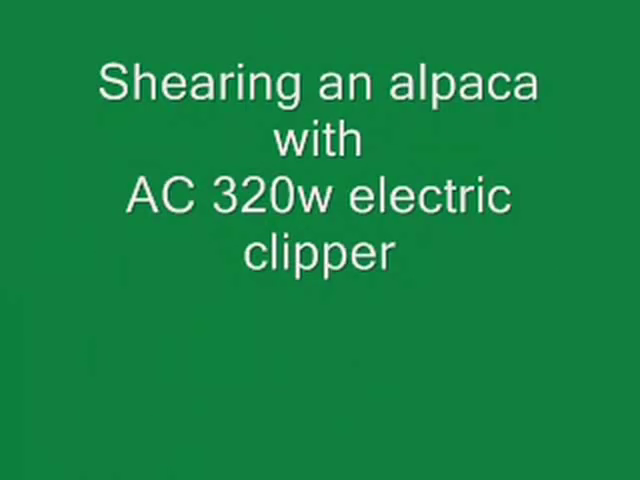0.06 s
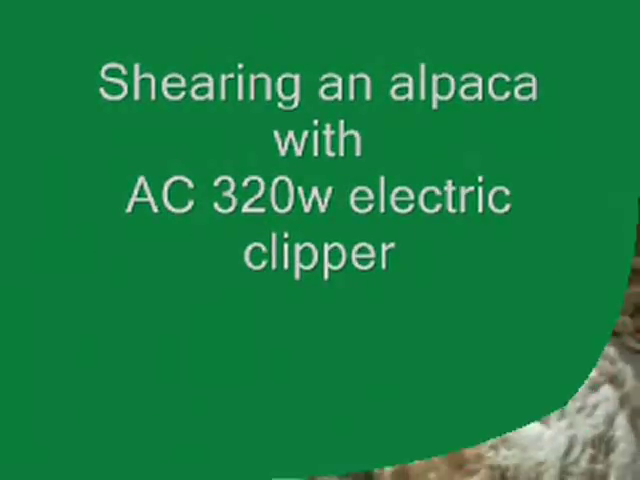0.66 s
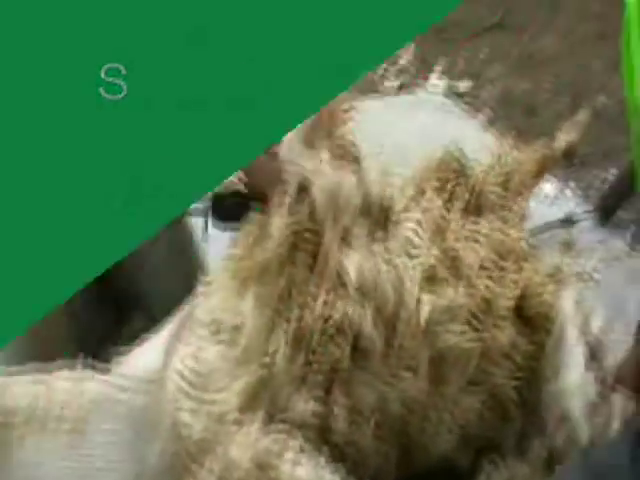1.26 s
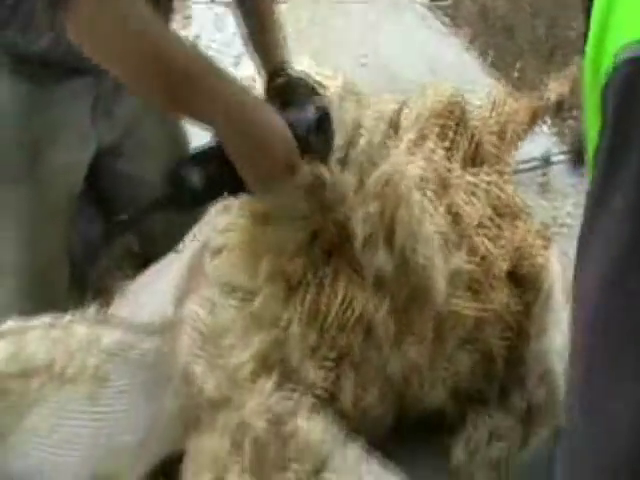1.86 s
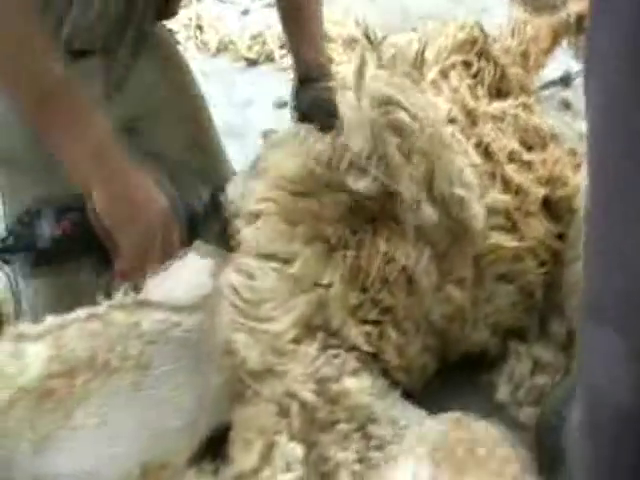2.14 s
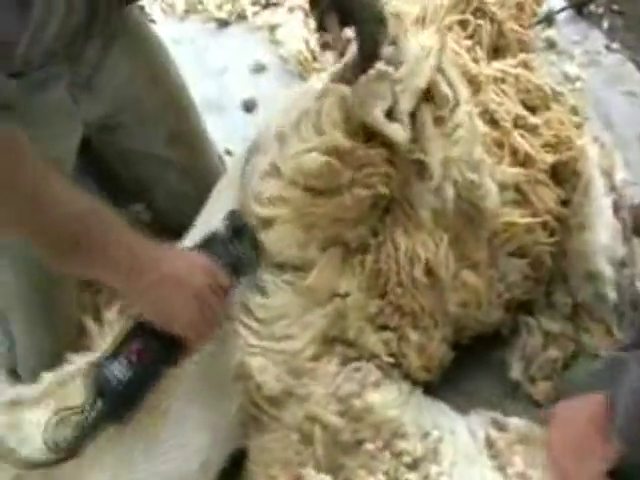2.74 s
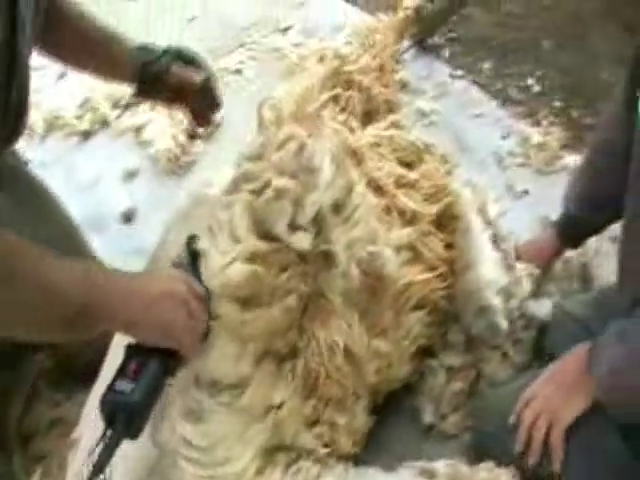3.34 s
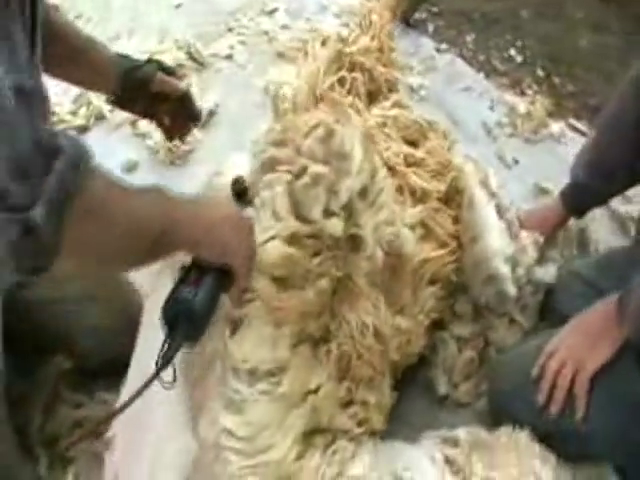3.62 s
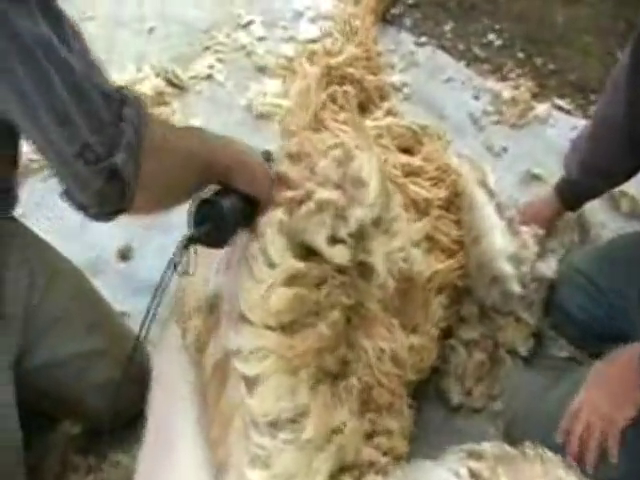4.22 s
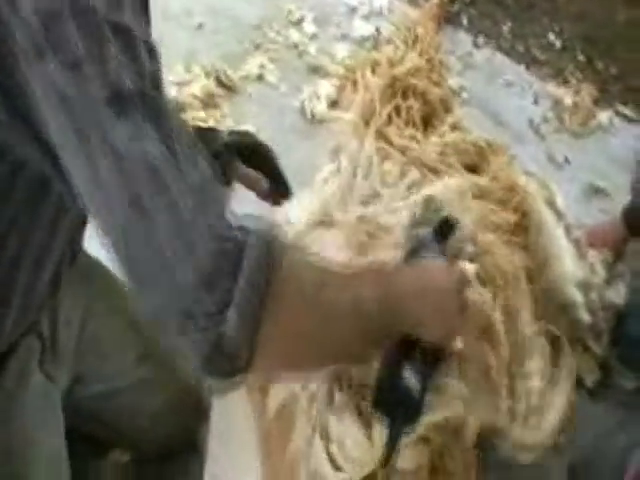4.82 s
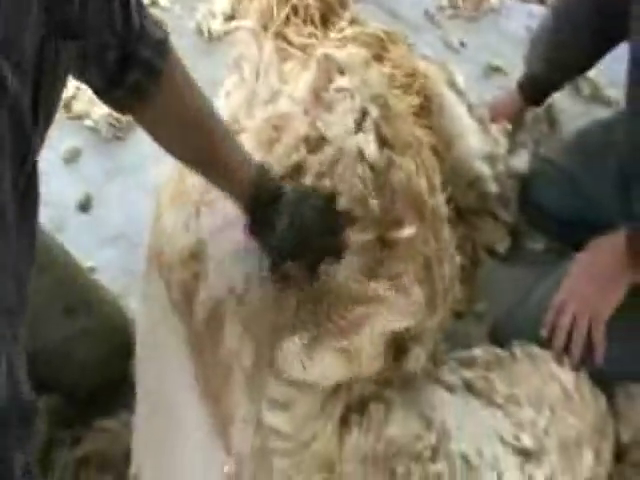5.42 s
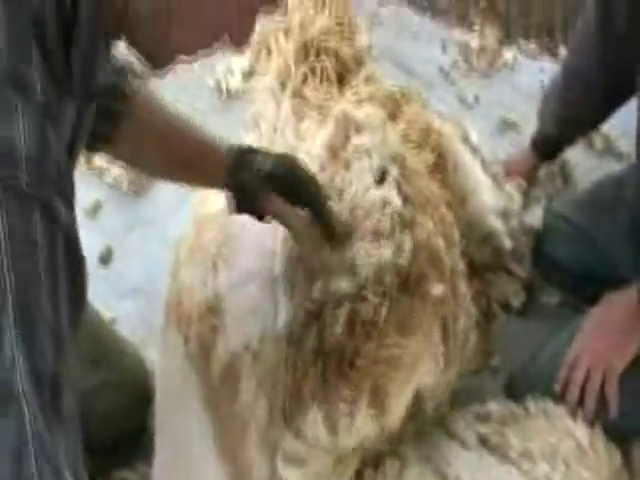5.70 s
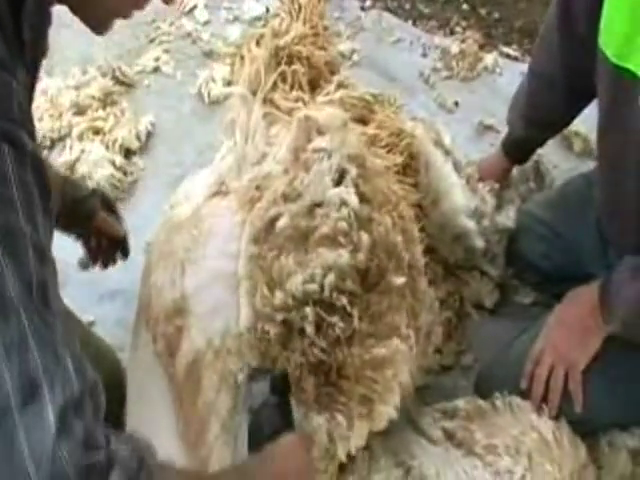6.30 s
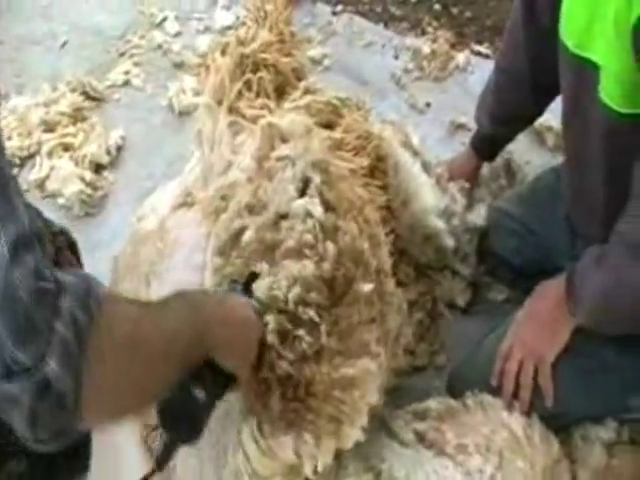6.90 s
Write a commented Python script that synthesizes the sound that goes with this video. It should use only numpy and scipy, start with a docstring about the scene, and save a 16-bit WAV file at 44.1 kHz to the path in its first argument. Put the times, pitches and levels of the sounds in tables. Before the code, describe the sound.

After a brief silence, an electric clipper cuts in, already running close to the microphone outdoors. Its high whine and fast metallic clatter mix with the hiss of alpaca fleece being cut. The pitch sags around the middle as the wool thickens, recovers, then dips again near the end. A small petrol engine hums steadily further off, and everything has a slightly hollow tinge.

```python
"""Outdoors at an alpaca shearing, a small camera's two microphone ports close to the electric handpiece.
The motor pinion whines, the cutter clatters to and fro over the steel comb, the fibres hiss as they are
cut, and the speed sags in thick fleece. A single-cylinder petrol engine hums further off.
The sound cuts in after a short silence. The camera's hum notches give it a hollow tinge."""
import sys
import numpy as np
from scipy import signal
from scipy.fft import rfft, irfft
from scipy.io import wavfile
from scipy.ndimage import map_coordinates

SR = 44100
rng = np.random.default_rng(int(sys.argv[2]) if len(sys.argv) > 2 else 0)


def generate_wav(sig):
    """Save sig (samples, or channels by samples) to the path in sys.argv[1] as 16-bit PCM at SR."""
    pcm = np.round(np.clip(np.atleast_2d(sig).T, -1, 1) * 32767).astype(np.int16)
    wavfile.write(sys.argv[1], SR, pcm)


N = 306936
T = np.arange(N) / SR
HZ = np.fft.rfftfreq(N, 1 / SR)

# motor shaft, slowing as the fleece thickens: t/s, speed/(turns/s)
SHAFT_SPEED = [(0.4, 365.0), (0.92, 374.4), (1.42, 375.8), (1.66, 381.8), (1.86, 383.3), (2.24, 380.0),
               (2.74, 382.6), (3.12, 373.4), (3.32, 366.2), (4.36, 349.2), (4.48, 349.6), (5.06, 367.1),
               (5.52, 376.0), (5.68, 376.6), (5.88, 373.3), (6.22, 363.9), (6.54, 362.2), (6.93, 353.4)]
# pinion whine: t/s, level/dB (all levels are relative; each layer adds its own trim)
WHINE_LEVEL = [(0.42, -34), (0.52, -38), (0.88, -32), (1.05, -32.5), (1.2, -24.5), (1.33, -25.5),
               (1.52, -34.5), (1.64, -28.5), (1.84, -44), (2.05, -22.5), (2.15, -29), (2.25, -20),
               (2.4, -28), (2.6, -27), (2.86, -30.5), (3.06, -30.5), (3.28, -26.5), (3.46, -40),
               (3.58, -25.5), (3.72, -37.5), (3.88, -28.5), (4.2, -29), (4.32, -45), (4.58, -36),
               (4.78, -29.5), (4.86, -35), (5.12, -33), (5.28, -25), (5.47, -30.5), (5.6, -22.5),
               (5.74, -22), (5.86, -34), (6.15, -25.5), (6.4, -26), (6.55, -32), (6.7, -36), (6.84, -27.5),
               (6.95, -33)]
# sidebands one stroke rate below, one and two above the whine: t/s, level/dB of each
SIDEBAND_LEVELS = [(0.4, -36, -36, -46), (1.0, -42, -46, -38), (1.35, -32, -40, -40), (1.8, -35, -46, -48),
                   (2.05, -37, -50, -44), (2.27, -26, -29, -29), (2.7, -33.5, -65, -39),
                   (3.1, -41, -53, -49), (3.4, -36, -31, -46), (3.65, -39, -31, -28), (3.95, -33, -39, -32),
                   (4.3, -31, -36, -32), (4.8, -33, -40, -36), (5.3, -38, -33, -33), (5.6, -27, -39, -37),
                   (5.8, -37, -35, -41), (6.1, -28, -28.5, -28), (6.35, -27, -29, -47),
                   (6.6, -62, -53, -51), (6.9, -33.5, -59, -42)]
# octave of the whine: t/s, level/dB
OCTAVE_LEVEL = [(0.4, -38), (0.52, -38), (0.8, -36.5), (1.0, -35), (1.15, -40), (1.52, -40), (1.74, -42),
                (1.86, -44), (1.99, -30.5), (2.5, -34), (2.78, -32.5), (3.05, -41), (3.18, -36),
                (3.36, -37), (3.52, -40), (3.68, -32), (3.95, -34), (4.08, -36), (4.22, -33), (4.45, -38),
                (4.9, -40), (5.15, -50), (5.8, -33.5), (5.92, -38), (6.1, -32.5), (6.48, -42), (6.63, -33),
                (6.8, -38)]
# gears chattering in their play: start/s, length/s, rise/dB
CHATTER_BOUTS = [(1.2, 0.26, 4.5), (2.03, 0.074, 12.5), (2.145, 0.14, 9.5), (2.32, 0.21, 6),
                 (3.46, 0.09, 3), (3.615, 0.066, 6.5), (3.8, 0.43, 2), (4.32, 0.14, 4.5), (5.23, 0.13, 6.5),
                 (5.55, 0.15, 2), (5.93, 0.38, 1), (6.82, .13, -6)]
# weak motor tones: multiple of the shaft speed, level/dB
SHAFT_HARMONICS = [(5, -46), (6, -43), (8, -42), (9, -49), (11, -46), (12, -45), (13, -48), (16, -51),
                   (19, -52), (21, -42), (24, -50), (25, -49), (26, -55), (28, -53)]
# the one spell in which the casing rings: start/s, length/s
CASING_RING_SPELL = (3.68, 1.9)
# colour of the clatter: f/Hz, level/dB
CLATTER_SPECTRUM = [(180, -52), (300, -22), (351, 16), (458, 3), (701, -11.5), (901, -18.5), (1120, -16),
                    (2310, -2), (2580, -4.5), (3210, -5.5), (4200, -11.5), (5150, -14.5), (7870, -14),
                    (10400, -23), (12800, -37.5), (16600, -68), (22000, -120)]
# housing resonances on top of that colour: f/Hz, width/Hz, level/dB
HOUSING_MODES = [(1160, 450, -4), (2410, 110, 3), (2880, 630, -14), (3674, 490, 3.5), (6780, 190, -13)]
# cutter knocking in the housing: t/s, level/dB
KNOCK_LEVEL = [(0.42, -36), (0.58, -34.5), (2.01, -31.5), (2.58, -35.5), (2.59, -33), (3.05, -35.5),
               (3.45, -33.5), (3.95, -37.5), (5.3, -31.5), (5.35, -37.5), (5.57, -32), (6.02, -34),
               (6.57, -38), (6.93, -36)]
# steel comb rattling: t/s, level/dB
COMB_LEVEL = [(0.42, -29.5), (0.95, -30.5), (1.25, -27.5), (1.4, -33), (1.55, -26), (1.72, -29.5),
              (2.05, -26), (2.62, -26.5), (3.15, -32), (3.3, -29), (3.8, -33.5), (4.1, -32.5), (4.46, -30),
              (4.63, -34), (5.0, -34.5), (5.24, -28), (5.38, -31.5), (5.8, -31.5), (5.9, -28.5), (6.3, -26),
              (6.7, -34), (6.93, -33.5)]
# teeth biting into the fleece: t/s, level/dB
BITE_LEVEL = [(0.4, -27.5), (0.6, -23.5), (1.54, -30), (1.78, -25), (2.02, -24.5), (2.31, -33.5),
              (2.75, -32), (3.09, -26), (3.91, -28), (4.11, -23), (4.58, -26), (4.72, -26.5), (4.95, -23),
              (5.2, -25), (5.9, -28), (6.45, -29), (6.93, -27.5)]
# fibre hiss, following how fast they are cut: t/s, level/dB
FEED_LEVEL = [(0.4, -25), (1.4, -25.5), (1.56, -21.5), (1.96, -19.5), (2.06, -22), (2.94, -23.5),
              (3.64, -22.0), (4.66, -24), (4.8, -21), (4.96, -19), (5.14, -20), (5.42, -23.5), (5.72, -20),
              (5.8, -23), (6.64, -22.5), (6.72, -24), (6.93, -24.5)]
# gliding bands that ring in the clatter: start/s, length/s, first f/Hz, last f/Hz, width/Hz, level/dB
GLIDING_RINGS = [(.55, 0.38, 3670, 3680, 300, -31.5), (0.694, 0.32, 1860, 1830, 256, -29.5),
                 (1.16, 0.18, 3870, 4020, 256, -33.5), (1.527, 0.058, 1750, 1740, 330, -28),
                 (1.728, 0.15, 1700, 1860, 350, -33.5), (2.234, 0.74, 3440, 3370, 256, -35),
                 (2.655, 0.35, 2270, 2330, 256, -36), (3.31, 0.12, 3600, 3640, 256, -30.5),
                 (4.074, 0.2, 4020, 3850, 350, -29.5), (4.673, 0.045, 2180, 2140, 256, -31),
                 (4.744, 0.04, 2580, 2540, 256, -32), (4.848, 0.27, 3900, 4020, 1500, -25.5),
                 (5.23, 0.05, 2480, 2200, 256, -27), (6.516, 0.24, 2020, 1830, 330, -35),
                 (6.77, 0.16, 4700, 4600, 800, -31)]
# ring of the chattering teeth: f/Hz, width/Hz, level/dB
CHATTER_MODE = [(2540, 300, 0)]
# fibres sizzling brightly on the comb: start/s, length/s, rise/dB
SIZZLE_BOUTS = [(2.17, 0.42, 4.5), (2.56, 0.13, 5.5), (3.54, 0.15, 4.5), (4.46, 0.19, 4.5)]
# band of that sizzle: f/Hz, width/Hz, level/dB
SIZZLE_MODE = [(9500, 1200, 0)]
# distant engine at the microphone: t/s, level/dB
ENGINE_LOUDNESS = [(0.4, -37), (0.99, -37), (1.05, -34), (1.64, -31), (1.98, -34.5), (2.08, -39),
                   (4.05, -38), (4.55, -34.5), (4.75, -31.5), (4.92, -34.5), (4.99, -36), (5.6, -39.5),
                   (6.93, -37.5)]
# wavering engine tones: multiple of the firing rate, level/dB
ENGINE_HARMONICS = [(2, -24), (3, -12.5), (5, -7.5), (8, -8), (9, -8), (10, 1), (11, -4), (13, -8),
                    (14, -4.5), (15, -9), (16, -13.5), (17, -5.5), (20, -11)]
# colour of the exhaust puffs: f/Hz, level/dB
EXHAUST_SPECTRUM = [(20, -20), (50, -38), (100, -14.5), (150, -7), (220, -28.5), (400, -10), (600, -9),
                    (1000, -46), (2000, -65)]
# the engine's boom dips and the next order up takes over: start/s, length/s, change/dB
BOOM_DIP_SPELLS = [(.88, 0.11, -12), (3.37, 0.088, -15), (4.95, 0.33, -7), (6.08, 0.24, -30)]
# the two microphone ports: f/Hz, left lead/rad, left minus right/dB, likeness (0-1)
MIC_PORTS = [(350, 0, 0, .998), (550, 0, 0, .986), (1100, 0, 0, .994), (2000, 0, 0, .994),
             (3600, 0, -1.9, .94), (5600, .03, -.9, .98), (7000, .1, -3.5, .86), (7600, .38, -4.4, .7),
             (8200, .93, -2.3, .58), (8900, .85, 1, .6), (10000, .38, .9, .66), (10600, .08, .2, .87),
             (12000, 0, 0, .99)]


def gain_of(db):
    """Decibels to amplitude."""
    return 10 ** (np.asarray(db) / 20)


def unit_rms(x):
    """Scales to rms 1."""
    return x / np.sqrt(np.mean(x ** 2) + 1e-20)


def curve(rows, column=1):
    """One column of a time table at every sample."""
    rows = np.array(rows)
    return np.interp(T, rows[:, 0], rows[:, column])


def swing(rows):
    """A level curve in dB above its own average."""
    return curve(rows) - curve(rows).mean()


def spectrum(rows, column=1):
    """One column of a frequency table, interpolated on a log axis."""
    rows = np.array(rows)
    return np.interp(np.log(HZ + 1), np.log(rows[:, 0] + 1), rows[:, column])


def shaped(x, response):
    """Filters by a response given at every frequency."""
    return irfft(rfft(x) * response, N)


def layer(x, response):
    """Filters, then scales to rms 1."""
    return unit_rms(shaped(x, response))


def drift(rate_hz):
    """A smooth random wander of rms 1."""
    return layer(rng.standard_normal(N), np.exp(-(HZ / rate_hz) ** 2))


def band(low_hz, high_hz, order=20):
    """A soft-edged pass band."""
    return 1 / (1 + (HZ / high_hz) ** order) - 1 / (1 + (HZ / low_hz) ** order)


def resonances(modes):
    """The summed response of a few modes."""
    return sum(gain_of(db) / (1 + 2j * (HZ - hz) / width) for hz, width, db in modes)


def spell(t, start, length, attack_s=.017, release_s=.029):
    """An envelope that sets in, holds and settles."""
    return np.clip((t - start) / attack_s, 0, 1) * np.exp(-np.maximum(t - start - length, 0) / release_s)


def bouts(rows):
    """A level change in dB during each row's spell."""
    return sum(db * spell(T, start, length) for start, length, db in rows)


def burst(cycles, at, rise, decay):
    """One burst a cycle; all times are shares of the cycle."""
    age = (cycles - at) % 1
    return (1 - np.exp(-age / rise)) * np.exp(-age / decay)


def impacts(force, per_s, spread_db=2.1):
    """A dense train of tiny metal contacts of uneven size."""
    size = gain_of(spread_db * np.minimum(rng.exponential(1, N), 4.5))
    hits = rng.random(N) < per_s / SR
    return force * size * hits * rng.choice([-1, 1], N)


def moving_echoes(x, sway=.211):
    """Arms, ground and animal reflect the tool; the paths change as it is moved about."""
    echoes = np.zeros(N)
    for delay_s in np.geomspace(.0007, .007, 6):
        late = T - delay_s * (1 + sway * np.tanh(drift(.671)))
        echoes += rng.choice([-1, 1]) * map_coordinates(x, [late * SR], order=3, prefilter=False)
    return unit_rms(echoes) * np.std(x)


def gears(turns, stroke, teeth=7):
    """Tooth mesh tones, close up; each stroke loads and twists the gear, which adds sidebands."""
    angle = 2 * np.pi * stroke - 1.5
    mesh = 2 * np.pi * teeth * turns + .035 * drift(130)
    whine = unit_rms(np.sin(mesh) * (1 + .15 * drift(90)))
    judder = np.zeros(N)
    for column, k in enumerate((-1, 1, 2), start=1):
        sideband_db = curve(SIDEBAND_LEVELS, column) - 2 + 1.5 * drift(8)
        judder += gain_of(sideband_db) * unit_rms(np.sin(mesh + k * angle))
    # under load the teeth bounce in their play, which roughens the judder
    mesh_noise = drift(170) * np.sin(mesh) + drift(170) * np.cos(mesh)
    bounce = unit_rms((1 + .8 * np.cos(angle)) * mesh_noise)
    bounce *= gain_of(-45 + .34 * swing(WHINE_LEVEL) + bouts(CHATTER_BOUTS))
    whine *= gain_of(curve(WHINE_LEVEL) + .9 + 1.56 * drift(4.6))
    # the octave throbs with each stroke and flickers as the tool is turned
    octave = np.sin(2 * mesh) + .84 * np.sin(2 * mesh - angle) + .17 * np.sin(2 * mesh + angle)
    octave *= np.sqrt(2) * gain_of(curve(OCTAVE_LEVEL) + 2 * drift(11))
    return whine + judder + bounce + octave


def motor(turns, casing_hz=4275, width_hz=80):
    """Thin shaft harmonics fade in and out; while the casing rings, those near its resonance flare."""
    tones, speed = np.zeros(N), curve(SHAFT_SPEED)
    for k, db in SHAFT_HARMONICS:
        detuning = 2 * (k * speed - casing_hz) / width_hz
        flare = 1 + 10 * spell(T, *CASING_RING_SPELL) / (1 + detuning ** 2)
        tone = np.sin(2 * np.pi * k * turns + .5 * drift(1.2) + .11 * drift(70))
        fade = gain_of(3 * drift(2.7))
        tones += gain_of(db) * unit_rms(flare * fade * tone)
    return tones


def cutter_contacts(stroke):
    """The cutter strikes hard at one end, scrapes less as it slows, and turns softly at the other."""
    strike = burst(stroke, at=.02, rise=.018, decay=.07) * gain_of(-drift(51))
    back = burst(stroke, at=.53, rise=.03, decay=.11) * gain_of(-drift(55))
    slide = np.sin(np.pi * ((stroke - .02) % 1) ** .6) ** 2
    flicker = gain_of(.5 * drift(25))
    knocks = impacts(flicker * (.5 + 2.6 * strike + .9 * back + .15 * slide), per_s=10000)
    scrapes = impacts(flicker * (.55 + 1.9 * strike + .25 * back + .45 * slide), per_s=14000)
    # one hard tap as the cutter reverses, much the same at every stroke
    tap = np.diff(np.floor(stroke - .04), prepend=-1) * gain_of(.5 * drift(60))
    knocks += gain_of(12) * tap
    scrapes += gain_of(4) * tap
    return knocks + .3 * moving_echoes(knocks), scrapes + .3 * moving_echoes(scrapes)


def clatter(knocks, colour):
    """The knocks shake housing, comb and gearbox; the gearbox rattles along with its whine."""
    housing = gain_of(curve(KNOCK_LEVEL) + 2.28) * layer(knocks, colour * band(657, 1715, order=10))
    comb = gain_of(curve(COMB_LEVEL) - 2) * layer(knocks, colour * band(1784, 2256))
    gearbox_db = -32 + .15 * swing(WHINE_LEVEL) + 1.44 * drift(3.2)
    gearbox = gain_of(gearbox_db) * layer(knocks, colour * band(2630, 3114))
    return housing + comb + gearbox


def cutting(scrapes, colour):
    """Teeth bite into the fleece, the blades rasp with the feed and the cut fibres hiss."""
    bite = gain_of(curve(BITE_LEVEL) - 1) * layer(scrapes, colour * band(2720, 4840))
    rasp_db = -31 + .87 * swing(FEED_LEVEL) + .21 * swing(OCTAVE_LEVEL) + 1.44 * drift(5.8)
    rasp = gain_of(rasp_db) * layer(scrapes, colour * band(4620, 6040))
    hiss = gain_of(curve(FEED_LEVEL) - 4) * layer(scrapes, colour * band(5950, 12500))
    return bite + rasp + hiss


def engine(unloaded_firing_hz=25.5, free_shaft_hz=383, drone_order=4, boom_order=7):
    """One cylinder, further off: a steady exhaust drone, wavering orders and a puff at each firing."""
    # the engine sags with the square of the shearing motor's load
    load = 1 - curve(SHAFT_SPEED) / free_shaft_hz
    firing_hz = unloaded_firing_hz * (1 - 3 * load ** 2)
    firings = np.cumsum(firing_hz * (1 + .003 * drift(5.9))) / SR
    phase, wander = 2 * np.pi * firings, .3 * drift(12)
    dip_db = bouts(BOOM_DIP_SPELLS)
    drone = unit_rms(np.sin(drone_order * phase))
    boom_db = 3.5 * drift(22) + drift(6) + dip_db
    boom = unit_rms(gain_of(boom_db) * np.sin(boom_order * phase + wander))
    upper_boom = (1 - gain_of(dip_db)) * unit_rms(np.sin((boom_order + 1) * phase))
    orders = np.zeros(N)
    for k, db in ENGINE_HARMONICS:
        level = gain_of(db + 3.5 * drift(33))
        orders += level * np.sin(k * phase + 2 * np.pi * rng.random() + wander * k / boom_order / 2)
    gas = rng.standard_normal(N) * (1 + .8 * burst(firings, at=0, rise=.05, decay=.3))
    puffs = layer(gas, gain_of(spectrum(EXHAUST_SPECTRUM)))
    exhaust = gain_of(-4) * unit_rms(orders) + gain_of(-12 + .32 * dip_db) * puffs
    hum = gain_of(-8.5) * drone + gain_of(-10) * (boom + upper_boom)
    return gain_of(curve(ENGINE_LOUDNESS)) * (hum + exhaust)


def gliding_ring(knocks, start, length, first_hz, last_hz, width_hz, db):
    """A narrow ringing band in the clatter that glides in pitch."""
    span = (T > start) & (T < start + length + .2)
    centre_hz = np.interp(T[span], [start, start + length], [first_hz, last_hz])
    carrier = np.exp(2j * np.pi * np.cumsum(centre_hz) / SR)
    pole = np.exp(-np.pi * width_hz / SR)
    # shift down, low-pass, shift back: a gliding resonator
    ring = (carrier * signal.lfilter([1], np.poly([pole, pole]), knocks[span] / carrier)).real
    out = np.zeros(N)
    out[span] = gain_of(db) * spell(T[span], start, length) * unit_rms(ring)
    return out


def gear_chatter(knocks):
    """The gear teeth ring in bouts as they chatter in their play."""
    rise = gain_of(bouts(CHATTER_BOUTS)) - 1
    return gain_of(-29) * rise * layer(knocks, resonances(CHATTER_MODE) ** 2)


def sizzle(scrapes):
    """Fibres sizzle brightly on the comb in short spells."""
    rise = gain_of(bouts(SIZZLE_BOUTS)) - 1
    return gain_of(-34) * rise * layer(scrapes, resonances(SIZZLE_MODE) ** 2)


def microphone_ports(air):
    """Left and right hear alike, except in the treble, where reflections reach them differently."""
    likeness = spectrum(MIC_PORTS, 3)
    mid = shaped(air, np.sqrt((1 + likeness) / 2))
    side = shaped(moving_echoes(air), np.sqrt((1 - likeness) / 2))
    left_bias = gain_of(spectrum(MIC_PORTS, 2) / 2) * np.exp(.5j * spectrum(MIC_PORTS, 1))
    return np.array([shaped(mid + side, left_bias), shaped(mid - side, 1 / left_bias)])


def hum_notches(x, spacing_hz=149.83, depth=.92, feedback=.56):
    """The camera cancels its own motor hum with narrow notches, leaving a hollow, metallic tinge."""
    delay = np.exp(-2j * np.pi * HZ / spacing_hz)
    return shaped(x, (1 - depth * delay) / (1 - feedback * delay))


def scene(turns_per_stroke=5.18):
    """Close to the microphone one shaft drives gears and cutter; the engine runs in the distance."""
    turns = np.cumsum(curve(SHAFT_SPEED) * (1 + .00023 * drift(11))) / SR
    stroke = turns / turns_per_stroke
    air = gears(turns, stroke) + motor(turns)
    knocks, scrapes = cutter_contacts(stroke)
    colour = gain_of(spectrum(CLATTER_SPECTRUM)) * (1 + resonances(HOUSING_MODES))
    air += clatter(knocks, colour) + cutting(scrapes, colour) + engine()
    air += sum(gliding_ring(knocks, *row) for row in GLIDING_RINGS)
    air += gear_chatter(knocks) + sizzle(scrapes)
    return microphone_ports(air)


def record(dry, start_s=.36, ceiling=.85, cutoff_hz=12500):
    """Hum notches, rounded peaks and a band limit; the sound cuts in abruptly after a short silence."""
    opened = hum_notches(dry) * np.clip((T - start_s) * 1000, 0, 1)
    rounded = opened / (1 + (opened / ceiling) ** 8) ** (1 / 8)
    lowpass = signal.firwin(255, cutoff_hz, window=("kaiser", 9), fs=SR)
    return signal.oaconvolve(rounded, lowpass[None], "same")


dry = scene()
out = record(dry)
generate_wav(out)
```